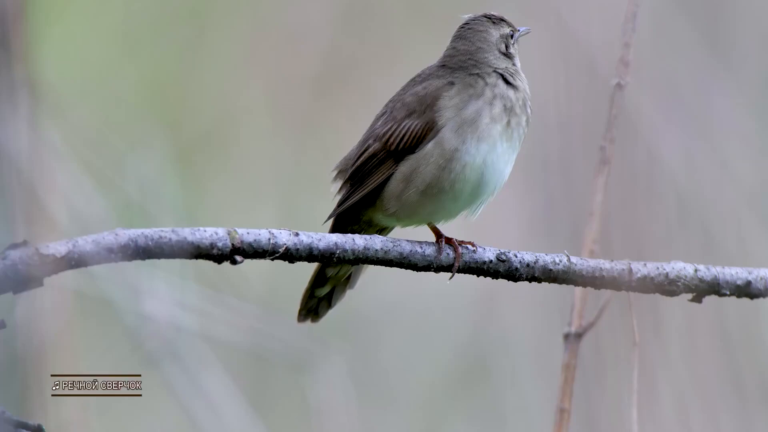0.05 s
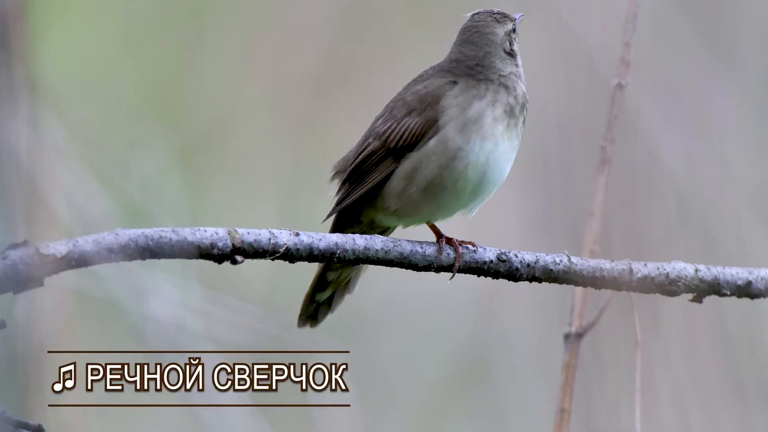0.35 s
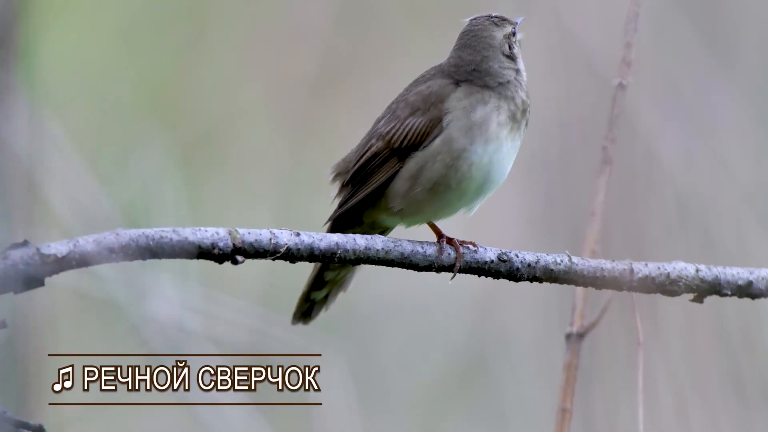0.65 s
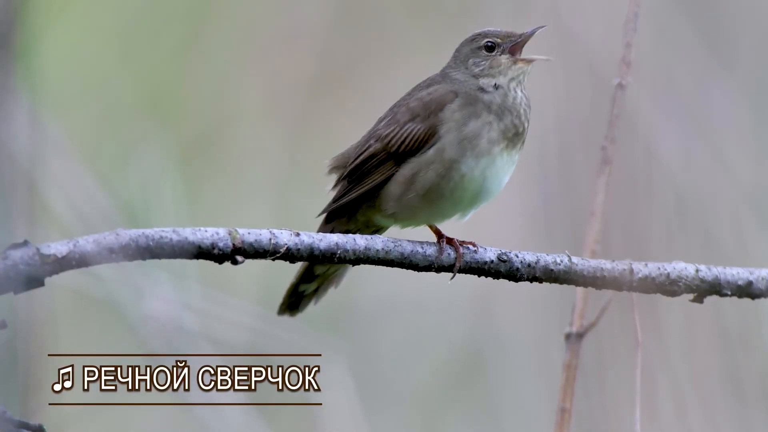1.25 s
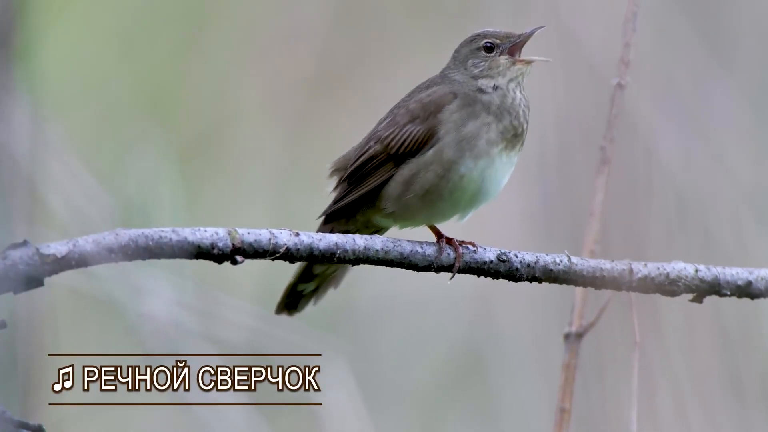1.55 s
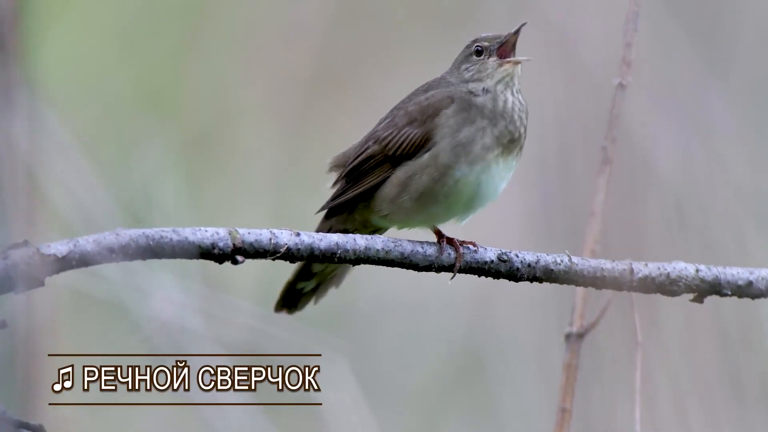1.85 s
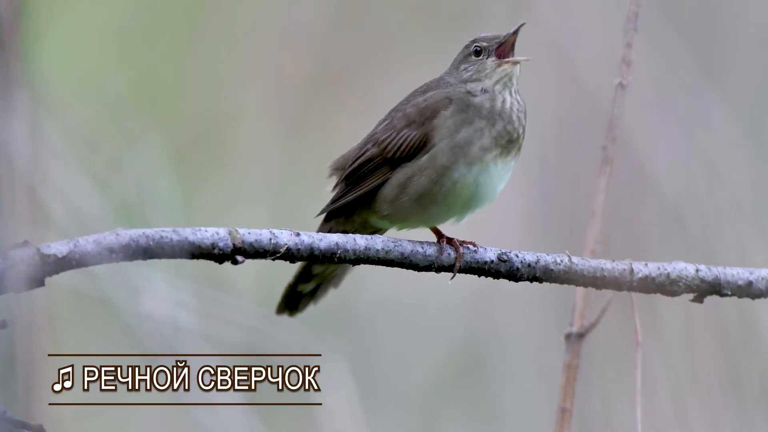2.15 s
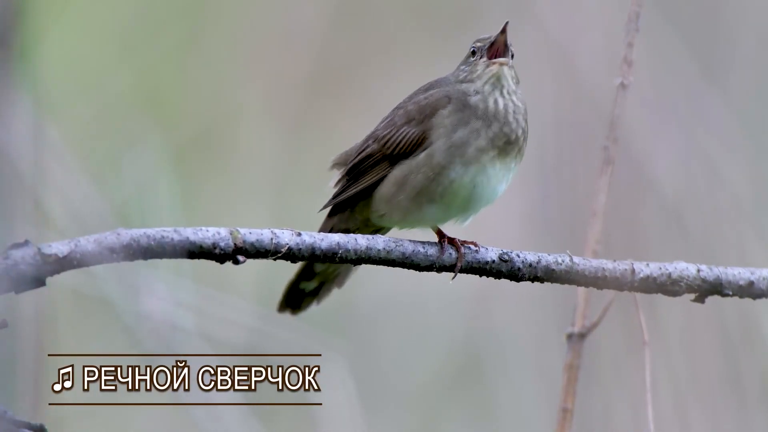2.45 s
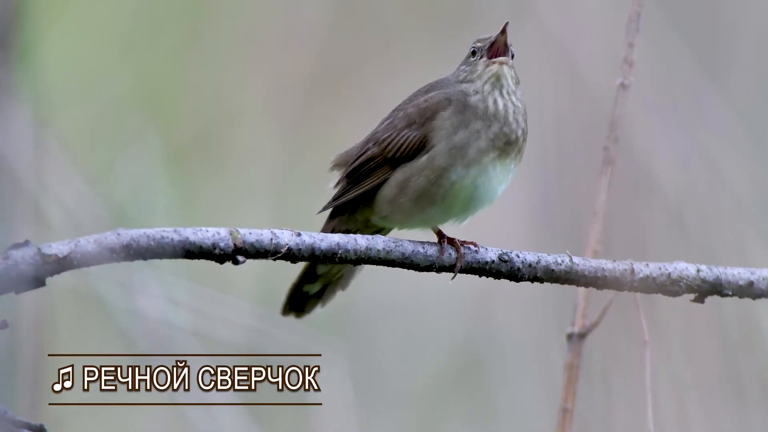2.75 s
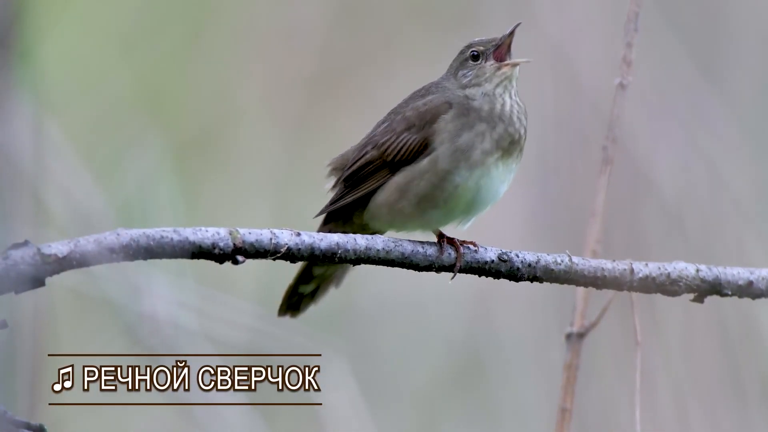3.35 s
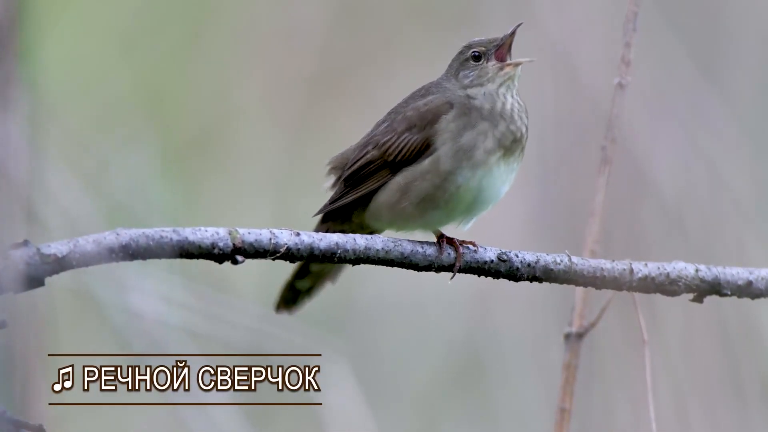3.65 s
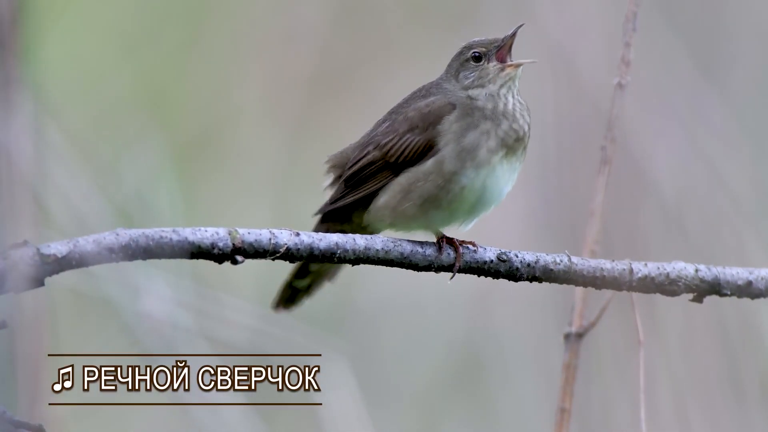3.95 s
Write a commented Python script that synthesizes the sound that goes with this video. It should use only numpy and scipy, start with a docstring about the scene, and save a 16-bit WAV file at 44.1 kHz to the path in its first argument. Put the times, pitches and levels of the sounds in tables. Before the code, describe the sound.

A warbler sings a fast, buzzy, insect-like trill close by while distant birds whistle.

```python
"""A soft rush of air comes first, with a brief rumble of wind and birds whistling far off in a wood.
Then a river warbler starts its shuttling trill close by: three syllables over and over, each a buzz
of tiny falling tones closed by a pure note. The ground and the leaves scatter its song.
Near the end come two dull knocks and a dry tick. The birds are made of tones that slide in pitch;
the air and the knocks are made of filtered noise."""
import sys
import numpy as np
from scipy import signal
from scipy.fft import rfft, irfft
from scipy.io import wavfile
from scipy.ndimage import uniform_filter1d

SR = 44100
rng = np.random.default_rng(int(sys.argv[2]) if len(sys.argv) > 2 else 0)


def master(y):
    """Save y as 16-bit WAV."""
    cut = np.clip(np.atleast_2d(y).T, -1, 1)
    pcm = np.round(cut * 32767)  # scale
    wavfile.write(sys.argv[1], SR, pcm.astype(np.int16))


N = 176400
T = np.arange(N) / SR


def from_db(db):
    return 10 ** (np.asarray(db) / 20)


def rms_one(x):
    """Scale a sound to an average power of one."""
    return x / np.sqrt(np.mean(x ** 2) + 1e-20)


def band(x, low_hz, high_hz):
    return signal.sosfilt(signal.butter(2, [low_hz, high_hz], "band", fs=SR, output="sos"), x)


def add(out, start_s, x):
    """Mix x into out from the given time on."""
    i = int(np.clip(start_s * SR, 0, N))
    out[..., i:i + x.shape[-1]] += x[..., :N - i]


def stereo(mid, side):
    """Make left and right from what they share (mid) and what sets them apart (side)."""
    return np.array([mid + side, mid - side])


def coloured(x, points):
    """Make some frequencies louder and others softer, along a curve of (frequency [Hz], gain [dB])."""
    hz, db = np.transpose(points)
    spectrum_hz = np.arange(N // 2 + 1) * SR / N
    gain_db = np.interp(np.log(spectrum_hz + 1), np.log(hz), db)
    return irfft(rfft(x) * from_db(gain_db), N)


def air():
    """Air rushes softly through the wood; wind rumbles on the microphone, and later a low rush swells."""
    # tone colour of the rush: (frequency [Hz], gain [dB])
    colour = [(30, -34), (55, -23), (90, -1.5), (160, 0), (300, 2), (550, -2.5), (1050, -1.5), (1450, -9),
              (2300, -7), (3600, -14.5), (8000, -18.5), (15000, -28)]
    # how wide the rush sounds: (frequency [Hz], side gain [dB])
    width = [(40, -6), (125, -39.5), (300, -24), (700, -11), (1500, -13.5), (12000, -18)]
    # loudness of the rush: (time [s], level [dB])
    rush_levels = [(0, -46.5), (2.3, -46), (4, -45.5)]
    # loudness of the wind rumble: (time [s], level [dB])
    rumble_levels = [(0, -49), (.15, -47.5), (.32, -47.5), (.42, -64), (.56, -65), (.63, -77)]
    # loudness of the low swell: (time [s], level [dB])
    swell_levels = [(1.5, -69), (2.0, -49.5), (2.65, -52), (3.3, -56), (4, -61)]
    mid, side, low, gust, gust_side = rng.standard_normal((5, N))
    rush = stereo(coloured(mid, colour), coloured(coloured(side, width), colour))
    rumble = band(stereo(gust, .55 * gust_side), low_hz=22, high_hz=73.5)
    swell = band(low, low_hz=196, high_hz=490)
    layers = (rush, rush_levels), (rumble, rumble_levels), (swell, swell_levels)
    return sum(rms_one(x) * from_db(np.interp(T, *np.transpose(levels))) for x, levels in layers)


def calls(table, tremble_hz, smooth_s):
    """Sliding tones whose pitch strays at random by about tremble_hz; a wide, fast tremble rasps."""
    out = np.zeros(N)
    tremble = tremble_hz * rms_one(uniform_filter1d(rng.standard_normal(N), size=int(smooth_s * SR)))
    for points in table:
        times, hz, db = np.transpose(points)
        on = (T >= times[0]) & (T < times[-1])
        pitch = uniform_filter1d(np.interp(T[on], times, hz), size=400) + tremble[on]
        envelope = from_db(np.interp(T[on], times, db)) * signal.windows.tukey(len(pitch), .15)
        out[on] += np.sqrt(2) * envelope * np.sin(2 * np.pi * np.cumsum(pitch) / SR)
    return out


def foliage(x, fade_s, width, build_s=.00027):
    """Countless tiny echoes off leaves and trunks build up, then fall by 60 dB in fade_s."""
    t = np.arange(SR) / SR
    mid, side = rng.standard_normal((2, SR)) * from_db(-60 * t / fade_s) * (1 - np.exp(-t / build_s))
    echoes = stereo(mid, width * side) / np.linalg.norm(mid)
    return signal.fftconvolve(x[None], echoes, axes=1)[:, :N]


def far_birds():
    """Far chips and whistles echo in the wood; a piping bird is deepest in it and echoes longest."""
    # raspy chips, one list each: (time [s], pitch [Hz], relative level [dB])
    chips = [
        [(.14, 6990, -48), (.152, 5380, -40.5), (.175, 3750, -44)],
        [(.27, 2786, -44), (.33, 2893, -41.5)],
        [(.45, 6200, -57), (.52, 6500, -58.5)],
        [(.575, 3840, -46), (.59, 5260, -51)],
        [(.622, 3550, -40), (.638, 5400, -53)],
        [(2.385, 3000, -42.5), (2.42, 4380, -40)],
        [(2.475, 2905, -42), (2.505, 4500, -39)],
        [(2.64, 4750, -25), (2.665, 4120, -43), (2.68, 3420, -42.5), (2.705, 2880, -39)],
    ]
    # pure whistles, one list each: (time [s], pitch [Hz], relative level [dB])
    whistles = [
        [(.15, 4290, -45), (.172, 3350, -49), (.19, 2900, -36)],
        [(.635, 3200, -46), (.675, 3550, -36), (.708, 3676, -32), (.745, 3270, -37.5), (.78, 2864, -32.5)],
        [(1.04, 3330, -40.5), (1.077, 3770, -32), (1.10, 3200, -32.5), (1.125, 3590, -39), (1.16, 2905, -27)],
        [(1.43, 4080, -48), (1.475, 3200, -52)],
        [(1.56, 4080, -56), (1.61, 3050, -44.5)],
        [(1.65, 3060, -50), (1.71, 3580, -54)],
        [(1.75, 4050, -51), (1.78, 3170, -59)],
        [(1.88, 3350, -61), (1.915, 3690, -54)],
        [(2.05, 3660, -52), (2.125, 3190, -53)],
        [(2.85, 2950, -55), (2.89, 2450, -51), (2.94, 2130, -43)],
        [(2.965, 2630, -46), (3.02, 2410, -50)],
        [(3.245, 3040, -45), (3.272, 2925, -33), (3.30, 2488, -37), (3.34, 2070, -30)],
        [(3.675, 3130, -39), (3.708, 2990, -33), (3.73, 2457, -37), (3.775, 2080, -29)],
        [(3.66, 3940, -57), (3.74, 4010, -42)],
    ]
    # sagging notes of the piping bird, one list each: (time [s], pitch [Hz], level [dB])
    pipes = [
        [(.448, 2605, -38), (.475, 2573, -40), (.55, 2372, -41.5)],
        [(2.055, 2614, -47), (2.11, 2583, -42.5), (2.17, 2351, -47.5), (2.29, 2320, -55.5)],
    ]
    chorus = calls(whistles, tremble_hz=38.5, smooth_s=.0012)
    chorus += calls(chips, tremble_hz=338, smooth_s=.00067)
    piping = calls(pipes, tremble_hz=36, smooth_s=.0012)
    chorus_echo = from_db(.5) * foliage(chorus, fade_s=.71, width=.45, build_s=.0009)
    piping_echo = from_db(1.5) * foliage(piping, fade_s=1.35, width=.45, build_s=.0009)
    return from_db(-3) * (chorus + chorus_echo) + piping + piping_echo


def voice(hz, envelope):
    """Two rows: a sliding tone, and its octave, which the open beak lets through in one high band."""
    beak_hz, beak_width_hz = 13700, 1840
    phase = 2 * np.pi * (np.cumsum(hz) / SR + rng.random())
    octave_gain = from_db(-21) * np.exp(-.5 * ((2 * hz - beak_hz) / beak_width_hz) ** 2)
    return np.sqrt(2) * envelope * np.array([np.sin(phase), octave_gain * np.sin(2 * phase)])


def add_buzz(out, end_s, db, count):
    """Tiny falling tones (sweeps) come so fast that they blur into a buzz; the last is at end_s."""
    swell_db, deepen_hz = 2.5, 423  # later sweeps grow a little louder and reach lower
    shy_db = max(-25 - db, 0)  # how far below full voice; soft buzzes start lower and stop higher
    gap_s = .0036 * (1 + .05 * rng.standard_normal())  # each buzz has a pace of its own
    for k, (late, loud, sharp, slow) in enumerate(rng.standard_normal((count, 4))):
        along = k / (count - 1)
        level_db = db + 2 + swell_db * (along - .5) + 1.63 * loud
        if k == 0:  # the opening sweep is shallow, slow and a little softer
            top_hz, bottom_hz, usual_s = 6350, 5700, .005
            level_db -= 3
        else:
            top_hz = 8087 - 80 * shy_db
            bottom_hz = 4750 - deepen_hz * along + 62 * shy_db
            usual_s = .0028
        length_s = usual_s * np.exp(.18 * slow)
        progress = np.linspace(0, 1, int(length_s * SR))
        pitch = bottom_hz + (top_hz - bottom_hz) * (1 - progress) ** 1.25 + 136 * sharp
        envelope = from_db(level_db) * signal.windows.tukey(len(pitch), .65)
        centre_s = end_s - (count - 1 - k) * gap_s + .00015 * late
        add(out, centre_s - length_s / 2, voice(pitch, envelope))


def warbler():
    """The bird sings rounds of three syllables, each a buzz and then a note that drops and levels off."""
    # rounds of the song, whose three notes are a sharp one, a long one and a flick: (time [s],
    # buzz level [dB], sharp pitch [Hz], sharp level [dB], long pitch [Hz], long level [dB],
    # flick level [dB]); the syllables add their boosts to these levels
    rounds = [(0.7578, -36.5, 7150, -32.5, 7000, -30.5, -29.5),
              (0.9385, -31.5, 6770, -24.5, 6660, -28, -29.5), (1.1244, -25, 7024, -26.5, 6680, -19, -30.5),
              (1.3052, -23.5, 7300, -20, 6460, -19.5, -56), (1.487, -23.8, 7190, -20, 6320, -19, -37),
              (1.6666, -23, 7430, -20.5, 6350, -19, -36), (1.8459, -22.5, 7020, -19, 6380, -16, -34.5),
              (2.0297, -21.5, 7220, -18.5, 6500, -18, -41), (2.212, -21, 7230, -19.5, 6550, -21.5, -34),
              (2.3925, -21.5, 7280, -19.5, 6340, -17, -41), (2.5729, -20, 7630, -19, 6670, -16.5, -33.5),
              (2.7525, -19.5, 7150, -18.5, 6580, -18.5, -49), (2.9338, -19.5, 7710, -21, 6400, -19, -33),
              (3.1176, -19.5, 7240, -16, 6290, -16.5, -54), (3.2999, -21.1, 7090, -16.5, 6470, -13.5, -35),
              (3.4815, -21, 6900, -18, 6240, -16.5, -32), (3.6628, -20.5, 7400, -17, 6430, -16, -33),
              (3.8457, -20.5, 7180, -18.5, 6550, -17, -37)]
    # syllables, timed from the start of a round's list entry: (buzz end [s], sweeps [count],
    # buzz boost [dB], note centre [s], note length [s], note fall [Hz], note boost [dB])
    syllables = [(-.009, 7, .5, .0004, .008, 1730, 2), (.0542, 8, 1, .0635, .015, 750, 0),
                 (.1135, 7, 1, .1235, .007, 1200, 6)]
    # the flick jumps up once the song is under way: (time [s], pitch [Hz])
    flick_pitch = [(.94, 6640), (1.12, 7855)]
    out = np.zeros((2, N))
    add_buzz(out, end_s=.69, db=-39, count=4)  # a lone, shy buzz comes first
    round_times, buzz_levels = np.transpose(rounds)[:2]
    middle_buzz_times = round_times + syllables[1][0]
    for time_s, _, sharp_hz, sharp_db, long_hz, long_db, flick_db in rounds:
        flick_hz = np.interp(time_s, *np.transpose(flick_pitch))
        notes = (sharp_hz, sharp_db), (long_hz, long_db), (flick_hz, flick_db)
        for syllable, (note_hz, note_db) in zip(syllables, notes):
            end_s, sweeps, buzz_boost, centre_s, length_s, fall_hz, note_boost = syllable
            buzz_db = np.interp(time_s + end_s, middle_buzz_times, buzz_levels)
            add_buzz(out, time_s + end_s, buzz_db + buzz_boost, sweeps)
            progress = np.linspace(0, 1, int(length_s * SR))
            pitch = note_hz + fall_hz * ((1 - progress) ** 3 - .5 ** 3)  # passes note_hz halfway
            envelope = from_db(note_db + note_boost) * signal.windows.tukey(len(pitch), .7)
            add(out, time_s + centre_s - length_s / 2, voice(pitch, envelope))
    return out


def thicket(tone, octave):
    """Shaped by throat and beak, the song arrives directly, off the ground and through the leaves."""
    # what the throat and beak let through: (frequency [Hz], gain [dB])
    throat = [(3800, -21.5), (4350, -16), (4750, -2), (5200, 1), (5600, -4), (6400, -2.5), (7600, -3.5),
              (8500, -3.5), (9500, 5.5)]
    # echo off the ground: (delay [s], gain [dB])
    bounces = [(.0113, -16)]
    tone = coloured(tone, throat)
    ground = sum(from_db(db) * np.pad(tone, (int(delay * SR), 0))[:N] for delay, db in bounces)
    head_angle = .93 * T  # in radians; the echoes shift as the bird turns its head
    aims = np.cos(head_angle), np.sin(head_angle)
    leaves = from_db(-1) * sum(foliage(tone * aim, fade_s=.32, width=.25) for aim in aims)
    wood = from_db(-10.5) * foliage(tone, fade_s=.55, width=.25)
    # the octave leaves the beak as a narrow beam, so most of it arrives off the leaves
    octave_echo = from_db(3) * foliage(octave, fade_s=.25, width=.56)
    return tone + ground + leaves + wood + octave + octave_echo


def knocks():
    """Two soft, dull knocks: bursts of low noise that die away quickly."""
    # the knocks: (time [s], level [dB])
    hits = [(3.073, -33), (3.729, -32.5)]
    decay_s = .014
    out, t = np.zeros(N), np.arange(SR // 5) / SR
    for time_s, db in hits:
        thud = rms_one(band(rng.standard_normal(len(t)), low_hz=90, high_hz=436))
        add(out, time_s - .004, from_db(db) * thud * np.exp(-t / decay_s))
    return out


def tick():
    """One dry tick: a high tone that dies almost as soon as it starts."""
    # the tick: (time [s], peak level [dB])
    hits = [(3.2348, -22.5)]
    pitch_hz, rise_s = 3300, .00036
    out, t = np.zeros(N), np.arange(SR // 5) / SR
    envelope = t / rise_s * np.exp(1 - t / rise_s)
    for time_s, db in hits:
        add(out, time_s, from_db(db) * envelope * np.sin(2 * np.pi * pitch_hz * t))
    return out


def scene():
    return air() + knocks() + tick() + thicket(*warbler()) + far_birds()


def record(dry):
    """The sound fades in after a moment of silence, and everything above 16000 Hz is cut."""
    fade_in = np.interp(T, [.043, .061], [0, 1])
    treble_cut = signal.cheby2(16, 70, 16000, fs=SR, output="sos")
    return signal.sosfilt(treble_cut, dry * fade_in)


dry = scene()
out = record(dry)
master(out)
```